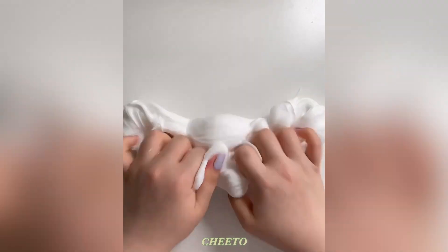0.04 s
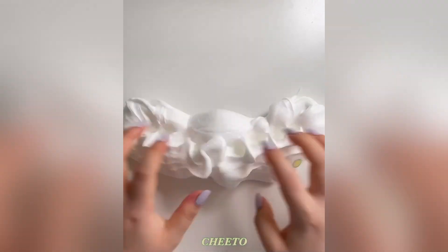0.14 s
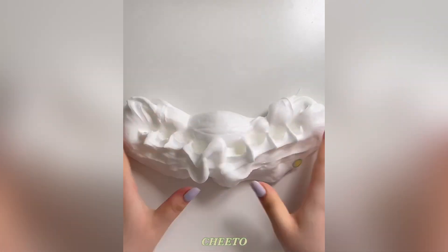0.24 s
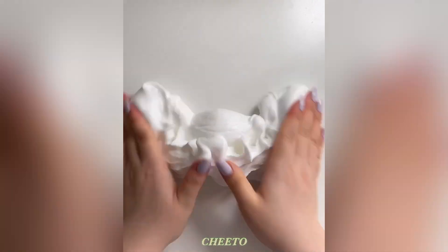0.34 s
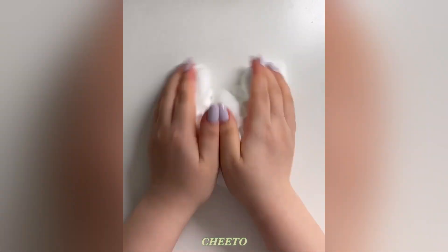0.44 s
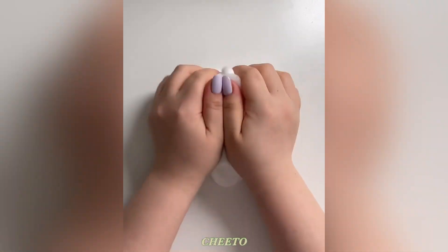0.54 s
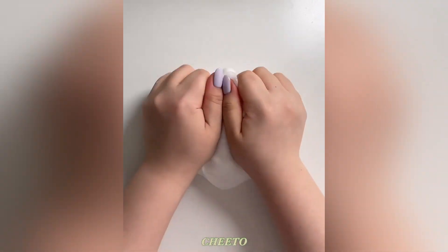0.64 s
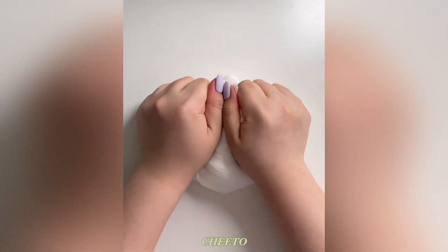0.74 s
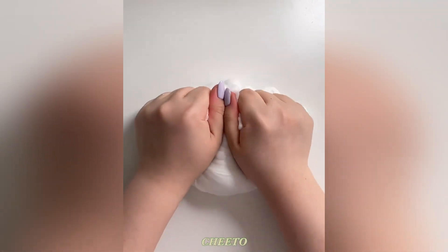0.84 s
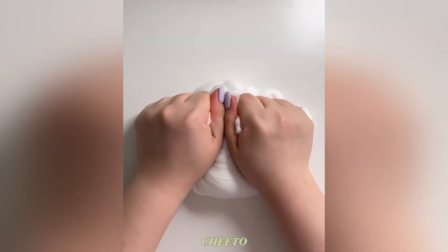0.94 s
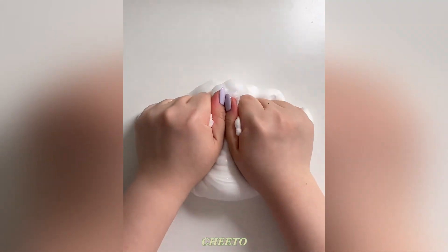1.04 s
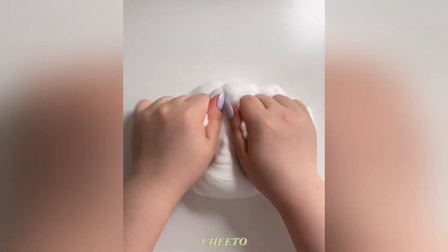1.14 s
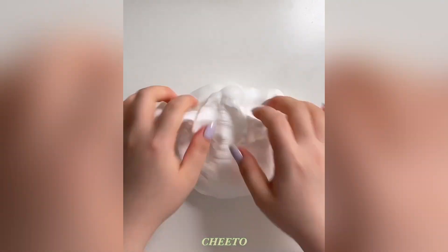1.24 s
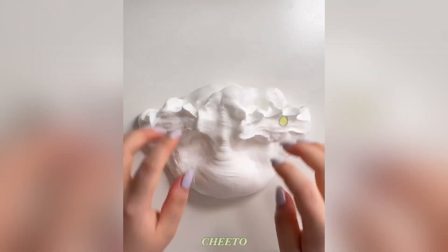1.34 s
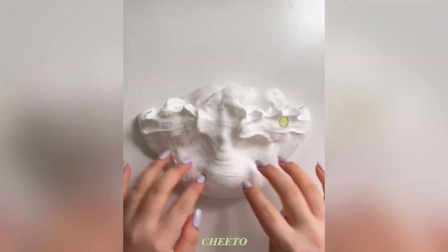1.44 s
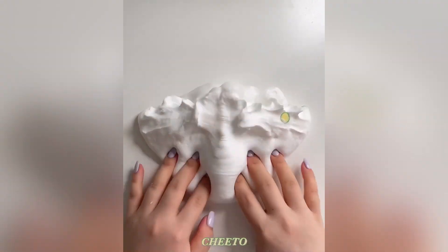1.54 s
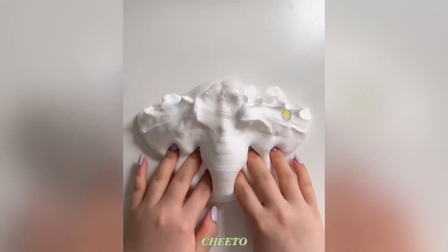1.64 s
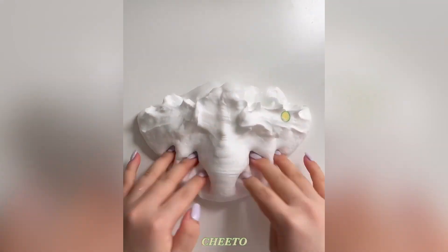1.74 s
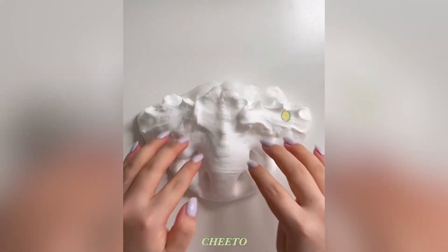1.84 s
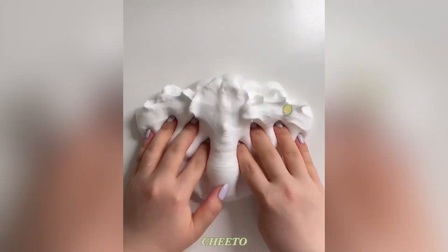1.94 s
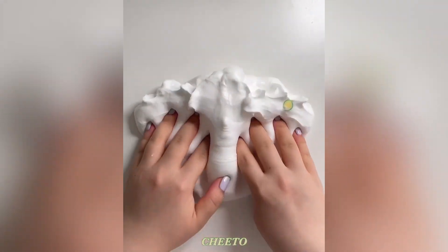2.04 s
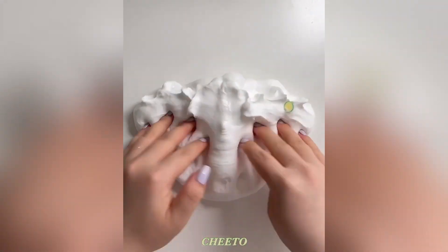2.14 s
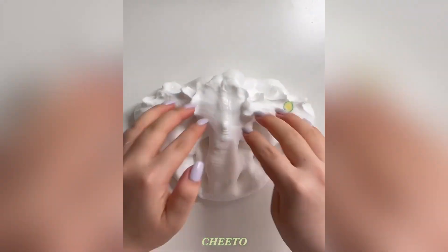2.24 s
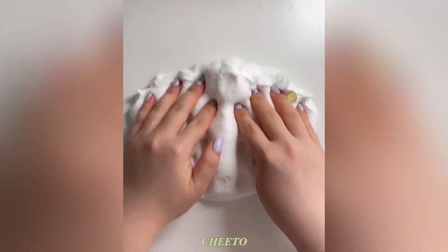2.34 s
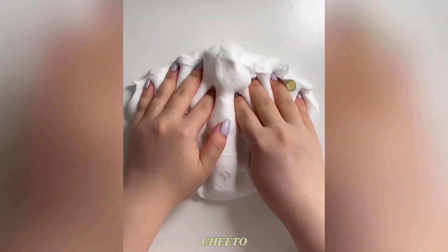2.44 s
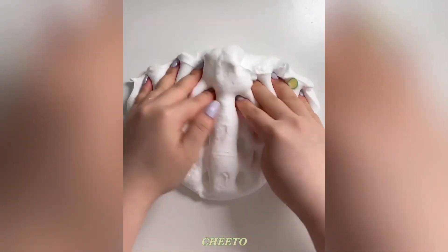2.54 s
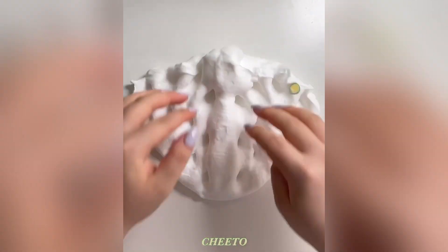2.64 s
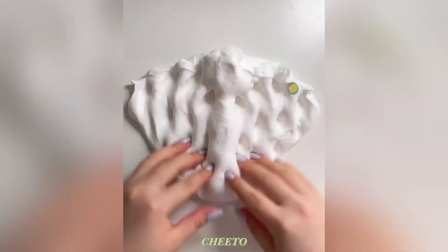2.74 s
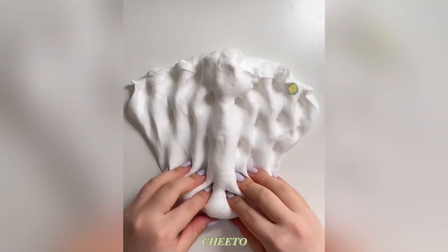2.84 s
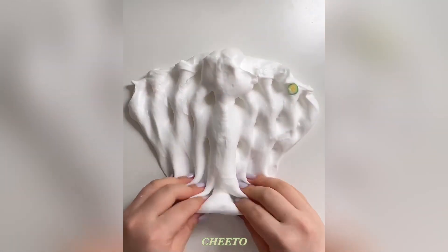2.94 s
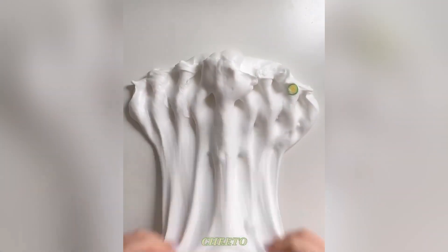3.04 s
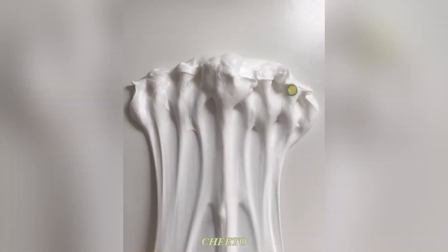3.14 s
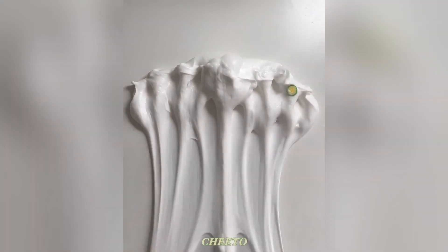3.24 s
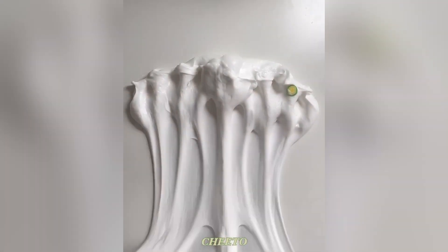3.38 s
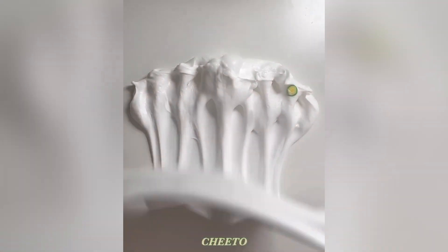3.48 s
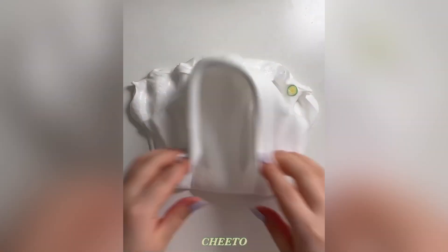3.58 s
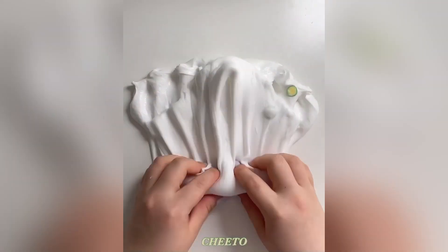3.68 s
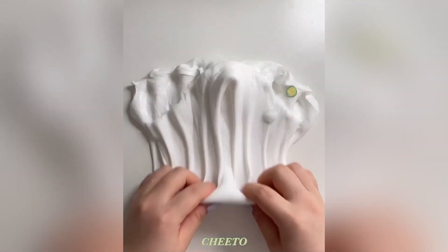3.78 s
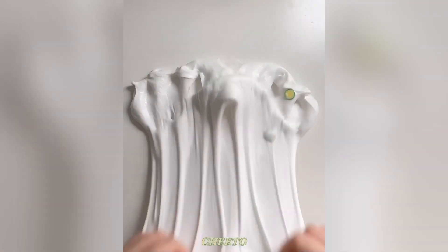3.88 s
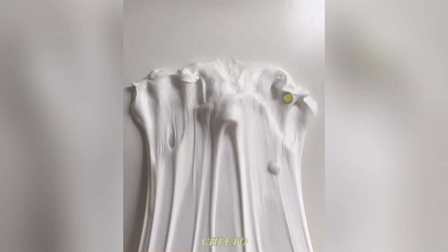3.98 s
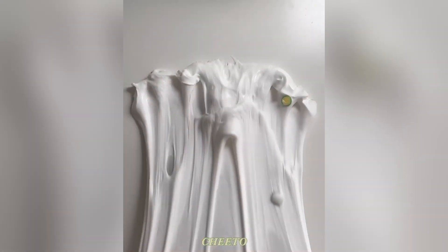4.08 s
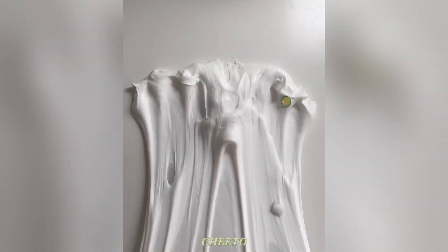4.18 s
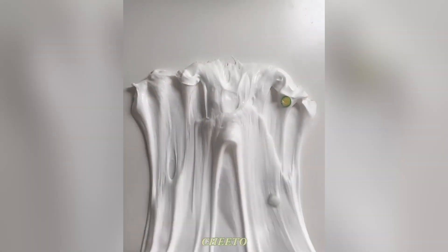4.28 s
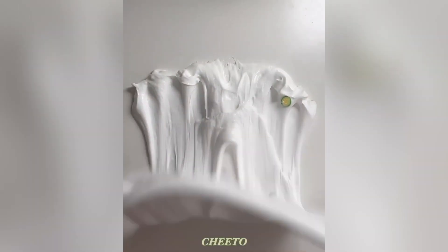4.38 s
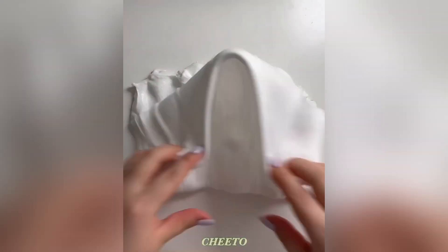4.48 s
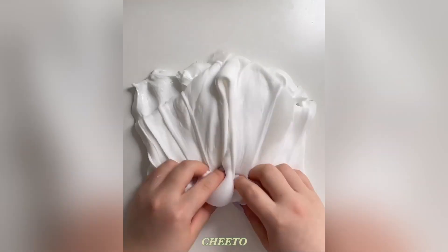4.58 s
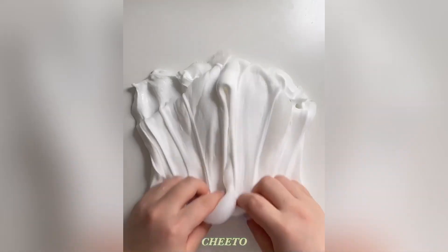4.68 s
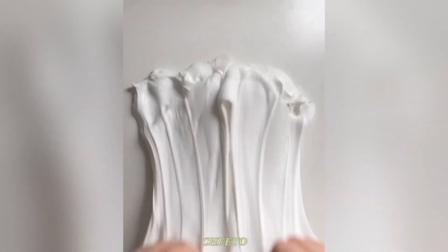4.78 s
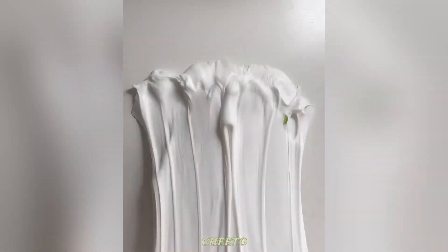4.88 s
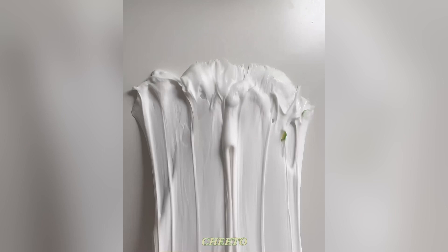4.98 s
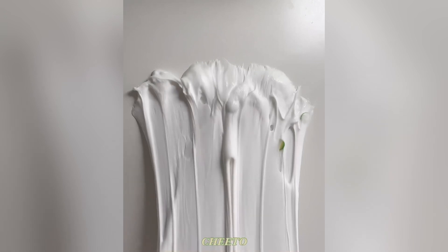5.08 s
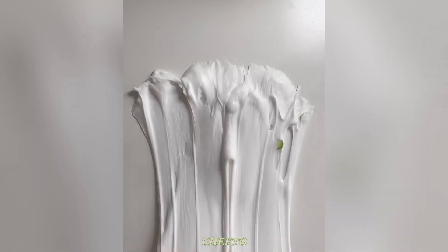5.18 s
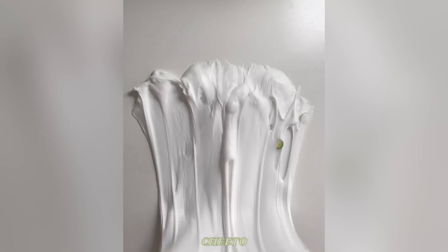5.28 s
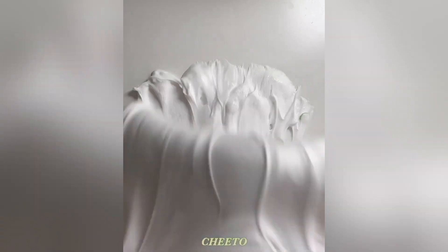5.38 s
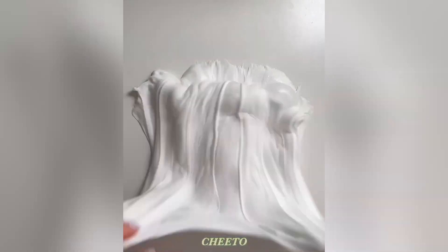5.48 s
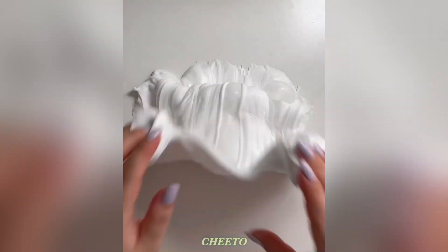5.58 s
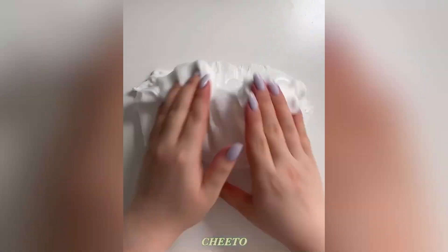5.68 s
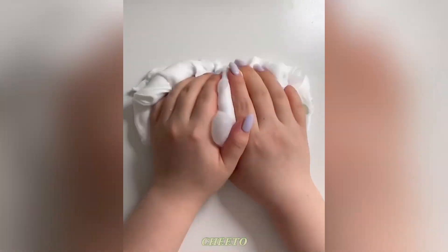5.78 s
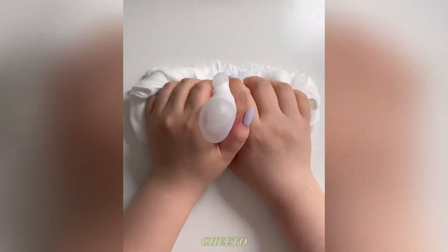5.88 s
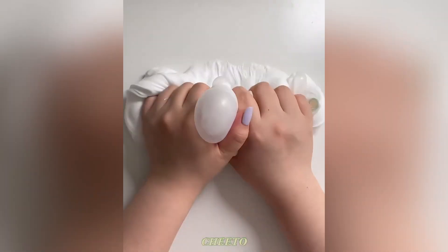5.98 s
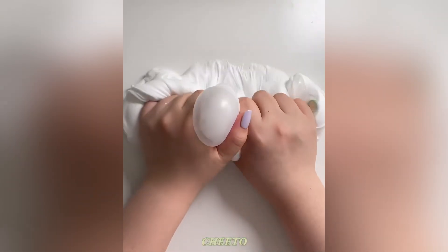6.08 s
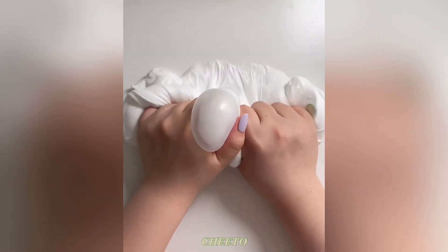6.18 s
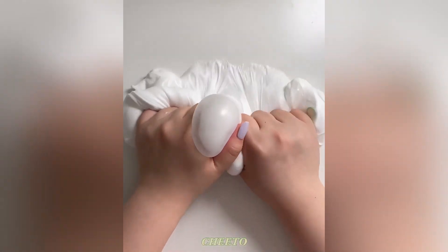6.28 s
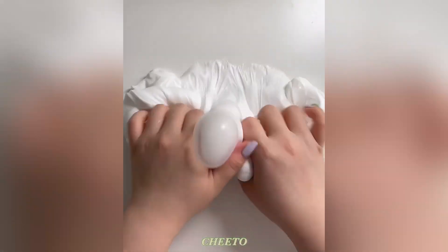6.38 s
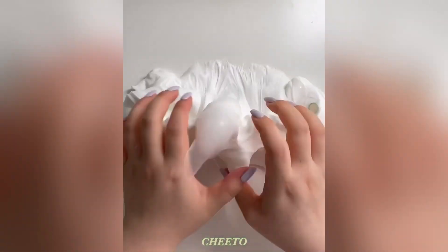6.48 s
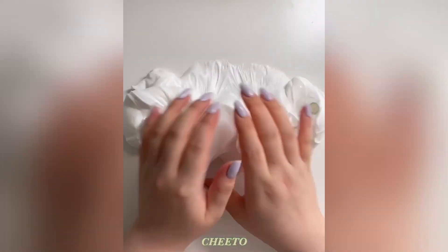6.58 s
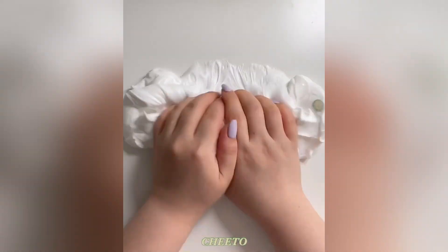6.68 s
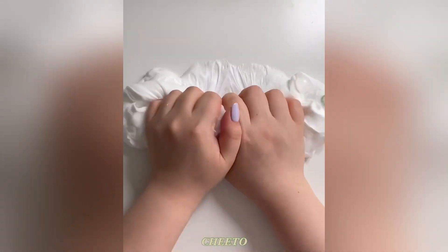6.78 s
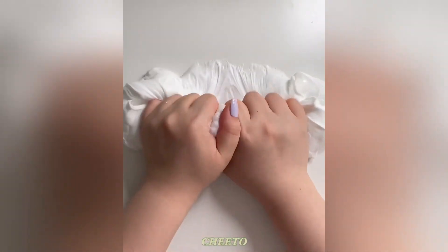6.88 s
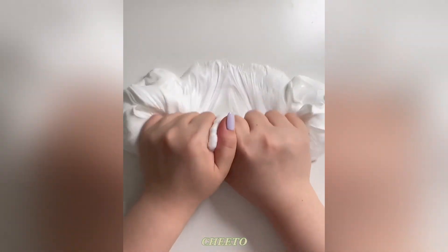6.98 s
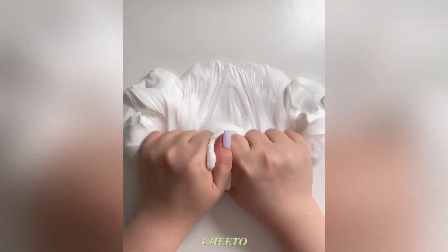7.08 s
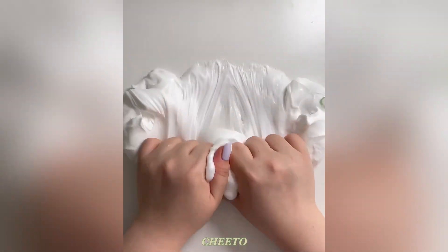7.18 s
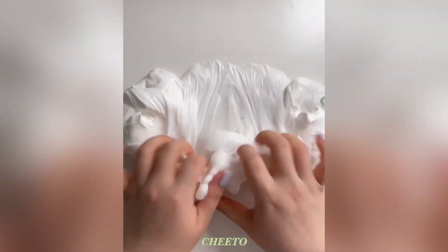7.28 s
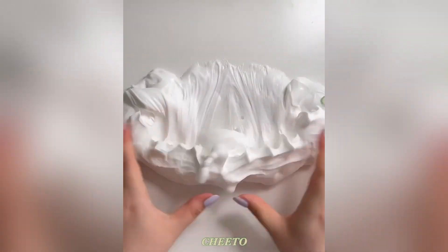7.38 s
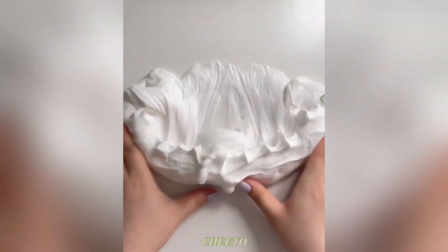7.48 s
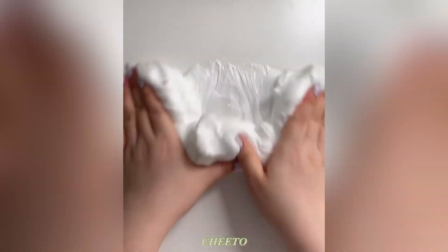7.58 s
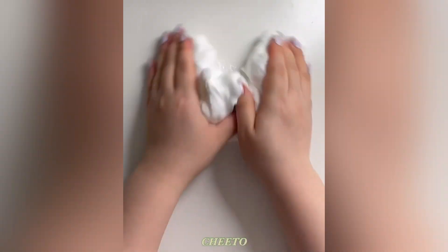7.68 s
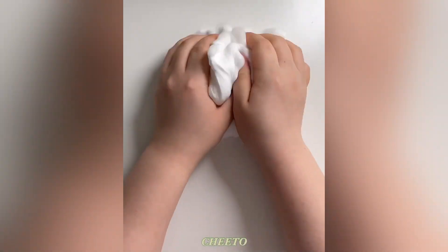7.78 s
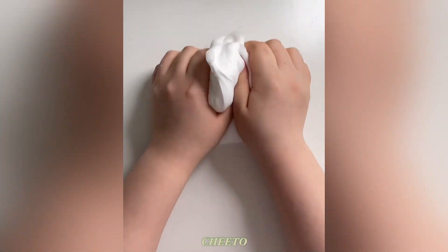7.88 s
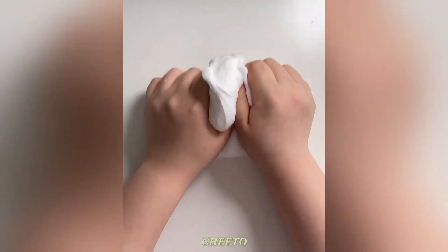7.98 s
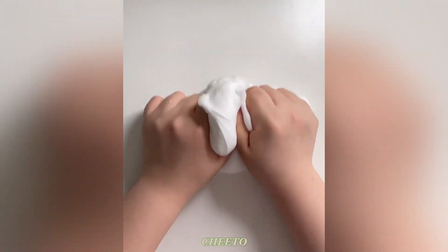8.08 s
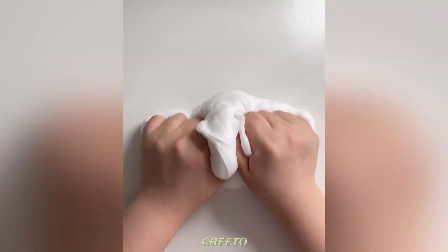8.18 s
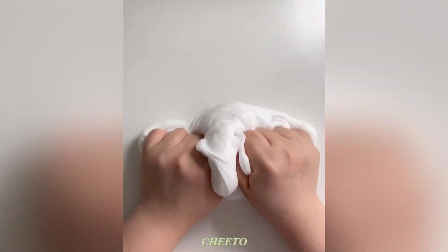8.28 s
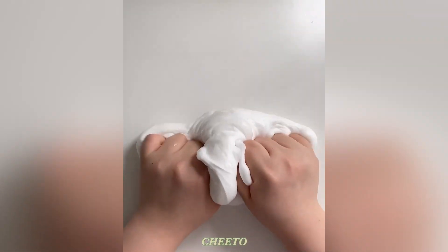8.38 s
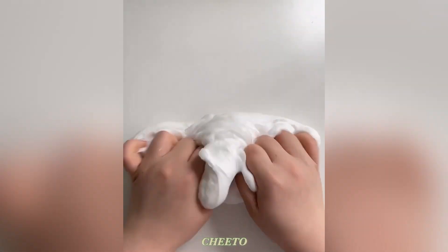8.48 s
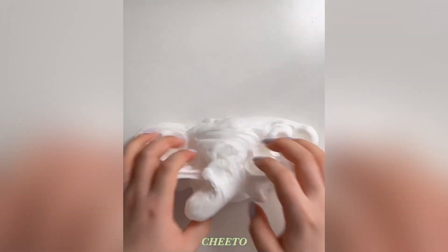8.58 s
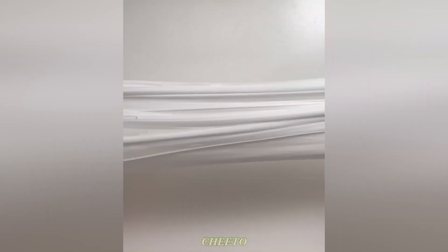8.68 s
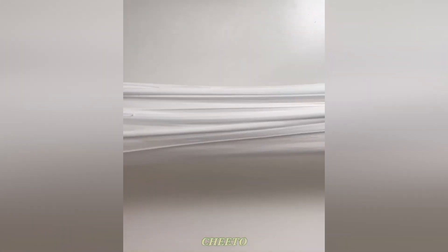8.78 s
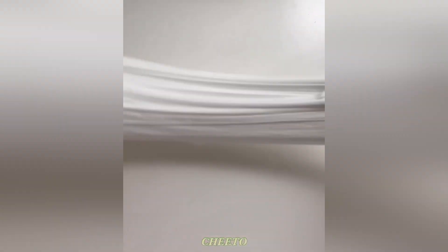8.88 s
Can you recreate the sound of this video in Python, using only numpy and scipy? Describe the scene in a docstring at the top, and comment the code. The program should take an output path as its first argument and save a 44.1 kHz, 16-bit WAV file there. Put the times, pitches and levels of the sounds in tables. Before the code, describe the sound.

Close, dry sound of thick slime handled on a table in a small room, over a faint wavering low hum. A soft crackle starts it, then from 0.4 to 0.9 s a cluster of bright pops and a low bump. Finger presses give short bursts with table knocks near 1.1, 1.7, 2.1 and 2.5 s, with thin wet fizz between. A quieter stretch at about 3 s leads to a very loud double snap at 3.5; another strong snap comes at 4.45, then soft pulling and hollow pops at 5.4. From 5.7 to 6.15 s a dense barrage of loud, clipped hollow pops, a low thump and tiny gliding squeaks of escaping air. After a short fizzy lull, another crackling run lasts from 6.6 to 7.2. Sparser pops follow, a hard snap at 8.0, soft blops at 8.4, a tiny airy chirp at 8.54, then a faint stretching hiss.

```python
"""On a table in a small room, thick slime is squeezed, folded and stretched by hand close to a microphone.
Air pockets burst as snaps, ringing cavities and table knocks; a few whistle in gliding tones as they empty.
Soft low bumps land, and coloured noise and tiny damped bubbles fizz while the slime moves.
Decaying noise tails make the room, wavering low noise makes the hum, and the loudest bursts clip."""
import sys
import numpy as np
from scipy import signal
from scipy.fft import rfft, irfft, next_fast_len
from scipy.io import wavfile
from scipy.ndimage import uniform_filter1d, map_coordinates

SR = 44100
rng = np.random.default_rng(int(sys.argv[2]) if len(sys.argv) > 2 else 0)


def waveform_to_disk(signal):
    """Save audio, clipped to [-1, 1], as 16-bit WAV at the path in sys.argv[1]."""
    frames = np.transpose(np.atleast_2d(signal))
    scaled = np.clip(frames, -1, 1) * 32767
    samples = np.round(scaled).astype(np.int16)
    wavfile.write(sys.argv[1], SR, samples)


N = 393806  # samples
SPAN_DB = 20  # the level change over which swell and fade times are given


def pops(rows):
    """The film tears and snaps, the opened cavity rings, loose slime sputters, the recoil knocks the table."""
    start_s, level_db, cavity_hz, snap_db, knock_db = np.transpose(rows)[..., None]
    lead_s = .003  # room for the onset to swell before the peak
    t = np.arange(SR // 40) / SR - lead_s
    noise = rng.standard_normal((len(rows), 2, len(t)))

    def swell(rise_s, fall_s):
        """Exponential rise to the peak at t = 0 and exponential fall after it."""
        return np.exp(np.minimum(t / rise_s, -t / fall_s))

    def band(x, lo_hz, hi_hz):
        """Band-pass filter that narrows noise to one region."""
        return signal.sosfilt(signal.butter(2, (lo_hz, hi_hz), "band", fs=SR, output="sos"), x)

    # higher cavities die sooner
    cavity = np.cos(2 * np.pi * cavity_hz * t) * swell(0.00056, 1.3 / cavity_hz)
    sputter = 1.263 * band(noise[:, 0], 740, 3280) * swell(0.00038, 0.0029)
    snap = band(noise[:, 1], 3800, 8840) * swell(0.00048, 0.002)
    air = amp(level_db) * (cavity + sputter) + amp(level_db + snap_db + 2.5) * snap
    # one short push, 1.5 ms after the peak
    recoil = amp(level_db + knock_db + 11.5) * np.exp(-((t - .0015) / 0.00036) ** 2)
    onset_s = start_s[:, 0] - lead_s
    return placed(onset_s, air) + table(placed(onset_s, recoil))


def small_pops(count):
    """Rows for pops() at chance moments: small pockets burst as strongly as the slime is worked."""
    when, pitch, size, snap, knock = rng.random((count, 5)).T
    start_s = .01 + when * (N / SR - .02)
    fizz_db = effort()[0][(start_s * SR).astype(int)]
    over_fizz_db, spread_db = 7.5, 10.5  # middle and full range of the level over the fizz
    grows, full_db = 0.71, -35.5  # below full_db of fizz, pops sink by this many further dB per dB
    sink_db = grows * np.minimum(fizz_db - full_db, 0)
    level_db = fizz_db + sink_db + over_fizz_db + spread_db * (size - .5)
    cavity_hz = 650 * 8 ** pitch
    snap_db = -5.5 + 16 * (snap - .5)
    knock_db = -9 + 24 * (knock - .5)
    return np.transpose([start_s, level_db, cavity_hz, snap_db, knock_db])


def whistles():
    """Air leaves a closing hole: a wavering, fluttering tone with weak overtones glides as the pocket empties."""
    # air whistling out: start_s [s], length_s [s], start_hz and end_hz [Hz, before waver],
    # level_db [dB, before flutter]
    leaks = [(5.657, .035, 1650, 1350, -27), (5.677, .014, 2400, 2900, -27), (5.786, .008, 5400, 4900, -19),
             (5.781, .006, 2400, 2000, -11), (5.785, .028, 1650, 1300, -6), (5.837, .005, 3900, 4300, -9),
             (5.841, .012, 5300, 5000, -6), (6.04, .045, 7100, 6900, -25), (6.708, .017, 9300, 5600, -7),
             (6.716, .009, 3900, 2400, -12), (8.542, .006, 1000, 600, -17)]
    out = np.zeros(N)
    for start_s, length_s, start_hz, end_hz, level_db in leaks:
        u = np.arange(round(length_s * SR)) / (length_s * SR)  # progress, 0 to 1
        waver = uniform_filter1d(rng.standard_normal((3, len(u))), size=40)
        pitch_hz = (start_hz + (end_hz - start_hz) * u) * (1 + .25 * waver[0])
        phase = 2 * np.pi * np.cumsum(pitch_hz) / SR
        # an inharmonic upper flutter of the rim, pi times the pitch
        lips = amp(-20.5 + 14.3 * waver[2]) * np.sin(np.pi * phase)
        # wet spray
        spit = amp(-18) * np.diff(uniform_filter1d(rng.standard_normal(len(u) + 1), size=8)) * 4
        tone = np.sin(phase) + amp(-24) * np.sin(2 * phase) + lips + spit
        level = amp(level_db + 22 * waver[1]) * np.sin(np.pi * u) ** .4
        out[round(start_s * SR):][:len(u)] += level * tone
    return out


def bumps():
    """A palm or a fold of slime lands softly: a short damped tone that sinks in pitch."""
    # low bumps and blops on the table: start_s [s], strength_db [dB, before the envelope],
    # pitch_hz [Hz, reached after sinking]
    landings = [(0.422, -9, 130), (3.846, -24, 62), (3.905, -25.5, 65), (4.667, -22, 68), (4.703, -15, 98),
                (5.413, -14.5, 85), (5.849, -2.5, 177.6), (6.03, -9, 143), (6.051, -10, 79.6),
                (6.702, -15.5, 90), (7.385, -20.5, 200), (7.785, -16.5, 155), (7.853, -11, 262),
                (8.408, -12, 760), (8.42, -18, 470), (8.546, -21, 260)]
    start_s, strength_db, pitch_hz = np.transpose(landings)[..., None]
    t = np.arange(SR // 5) / SR
    sag, sag_s = .4, 0.0048  # starts this share above its pitch and sinks with this time constant
    phase = 2 * np.pi * pitch_hz * (t + sag * sag_s * (1 - np.exp(-t / sag_s)))
    envelope = np.exp(-t / .012) * (1 - np.exp(-t / 0.0015))
    return placed(start_s[:, 0], amp(strength_db) * np.sin(phase) * envelope)


def motion():
    """Skin and film hiss as they slide, bubbles crackle more under hard squeezing, fingers shake the table."""
    # hiss colour: pitch_hz [Hz], density_db [dB per Hz, relative]
    hiss_colour = [(400, -36.5), (1100, 2), (2500, 0.5), (4000, -4.5), (8500, -10), (10500, -15.5)]
    fizz_db, knead_db = effort()
    squeeze = np.clip((fizz_db + 47.0) / 20, .05, 1)
    hiss = amp(2.7 * wobble(60)) * coloured(rng.standard_normal(N), hiss_colour)
    fizz = hiss + 1.13 * squeeze * unit(bubbles(count=2500))
    # separate soft presses, about 260 a second, over a faint rub
    touch = 0.059 + (rng.random(N) < 260 / SR) * 1.4
    taps = rng.standard_normal(N) * touch
    knead = table(uniform_filter1d(taps, size=24))
    return amp(fizz_db) * fizz + amp(knead_db) * unit(knead)


def bubbles(count):
    """Small bubbles, each a few damped cycles at its own pitch and size."""
    when, pitch, size = rng.random((count, 3)).T[..., None]
    pitch_hz = 800 * 9 ** pitch
    cycles = pitch_hz * np.arange(SR // 100) / SR
    shape = np.sin(2 * np.pi * cycles) * np.exp(-cycles / 1.7) * (1 - np.exp(-cycles / 0.71))
    size_db = np.minimum(-5 * np.log(1 - size), 22)  # many small, few large
    return placed(when[:, 0] * N / SR, amp(size_db) * shape)


def effort():
    """Level in dB of the fizz and of the kneading, from the summed power of presses and pulls."""
    # fingers press into the slime: start_s [s, the peak], fizz_db [dB], knead_db [dB, on the table]
    presses = [(0.0, -33, -30), (.435, -27.5, -25.5), (.53, -51.5, -27), (.6, -42, -27), (.815, -47, -42),
               (1.085, -28.5, -17.5), (1.415, -45.5, -30), (1.668, -34, -15.5), (1.89, -66.5, -43),
               (2.075, -27.5, -11.5), (2.28, -52, -42), (2.46, -46, -38.5), (2.5, -27, -15),
               (2.695, -33.5, -26), (3.5, -38, -35.5), (3.535, -25.5, -16.5), (3.71, -39, -33.5),
               (4.438, -25.5, -27.5), (4.72, -51, -47), (5.405, -32.5, -30.5), (5.665, -33, -29),
               (5.85, -21, -23), (5.95, -38.5, -19), (6.04, -25.5, -24), (6.265, -35, -25),
               (6.34, -37.5, -31), (6.585, -34, -24), (6.655, -27, -31), (6.7, -22, -40.5),
               (6.91, -28, -33), (7.39, -62, -46), (7.498, -33, -27), (7.86, -36.5, -25), (8.0, -38, -19),
               (8.41, -43, -20), (8.55, -62, -36)]
    # slow pulls, folds and slides: peak_s [s], swell_s [s] and fade_s [s] over SPAN_DB, fizz_db [dB]
    slow_pulls = [(.235, .035, 0.34, -42.5), (.33, 0.11, 0.63, -36), (.6, 0.25, 0.43, -46),
                  (1.15, 0.13, 0.055, -34), (1.35, 0.6, 0.29, -51.5), (1.88, 0.15, 0.072, -51.5),
                  (2.299, 0.36, 0.16, -47.5), (2.91, 0.11, 0.23, -36), (3.401, 0.21, 0.4, -54),
                  (3.72, 0.42, .28, -40), (4.26, 0.16, 0.16, -47), (4.62, 0.083, 0.25, -38.5),
                  (4.8, 0.37, 0.16, -46.5), (5.22, 0.24, 0.15, -46.5), (5.6, 0.037, .2, -49),
                  (5.76, .2, 0.86, -37.5), (6.31, 0.066, 0.11, -33), (6.831, 0.18, 0.27, -34),
                  (7.211, 0.18, 0.075, -32), (7.55, 0.2, 0.78, -35.5), (8.1, 0.81, 0.2, -42),
                  (8.4, 0.054, 0.23, -31.5), (8.48, 0.13, 0.06, -33.5), (8.839, 0.12, 0.46, -41)]
    press_s, press_fizz_db, press_knead_db = np.transpose(presses)
    peak_s, swell_s, fade_s, pull_db = np.transpose(slow_pulls)
    still_db = -76  # slime left at rest
    # power 1 = straight slopes in dB, more = rounder top and steeper ends
    pulls = peaks(peak_s, pull_db, swell_s, fade_s, 1.42) + amp(still_db) ** 2
    fizz_rise_db_s, fizz_fall_db_s = 698, 175.5
    knead_rise_db_s, knead_fall_db_s = 1500.5, 217.5
    fizz = pulls + peaks(press_s, press_fizz_db, SPAN_DB / fizz_rise_db_s, SPAN_DB / fizz_fall_db_s, 0.99)
    press_knead = peaks(press_s, press_knead_db, SPAN_DB / knead_rise_db_s, SPAN_DB / knead_fall_db_s, 1)
    knead = pulls * amp(-8) ** 2 + press_knead  # pulls knead 8 dB below their fizz
    return 10 * np.log10(fizz), 10 * np.log10(knead)


def peaks(peak_s, level_db, swell_s, fade_s, power):
    """Summed power of swells that rise and fall SPAN_DB in the given times."""
    t = np.arange(0, N, 64)[:, None] / SR - peak_s  # one value every 64 samples
    shape_db = level_db - SPAN_DB * np.maximum(-t / swell_s, t / fade_s) ** power
    return np.repeat(np.sum(amp(shape_db) ** 2, axis=1), 64)[:N]


def table(push):
    """The pushed table top rings in its resonant modes, added with alternating sign."""
    # modes of the table top: centre_hz [Hz], width_hz [Hz], level_db [dB]
    modes = [(124, 32, -5.5), (259.2, 29.2, 0), (454.4, 45, -6.5), (603, 24, -8), (746, 110, -8.5),
             (1073, 140, -10.5)]

    def response(f):
        """Sum of damped resonances; a wider mode dies sooner."""
        return sum((-1) ** k * amp(level_db) * 1j * f * width / (centre * centre - f * f + 1j * f * width)
                   for k, (centre, width, level_db) in enumerate(modes))

    return filtered(push, response)


def room(x):
    """Each frequency dies at its own speed; two noise tails alternate as the hands move, here at random."""
    # decay of the room: pitch_hz [Hz], t60_s [s to fall 60 dB]
    decay = [(100, 0.34), (500, 0.41), (2000, 0.16), (9000, 0.12)]
    turn = np.pi / 4 * (1 + np.tanh(0.75 * wobble(8)))
    wet = np.zeros(N)
    for share in (np.cos(turn), np.sin(turn)):
        hz, t, bins = signal.stft(rng.standard_normal(SR // 2), SR, nperseg=256)
        fading = bins * amp(-60 * t / along(decay, hz)[:, None])
        tail = signal.istft(fading, SR, nperseg=256)[1]
        late = np.pad(x * share, (130, 0))  # the answer waits about 3 ms
        wet += signal.fftconvolve(late, tail / np.linalg.norm(tail))[:N]
    return wet


def hum():
    """The low, slightly wavering background of the room, made of coloured noise."""
    # hum colour: pitch_hz [Hz], density_db [dB per Hz, relative]
    hum_colour = [(20, -43), (32, -37.5), (54, -5), (75, -11), (120, -7), (300, -22.5), (600, -19.5),
                  (900, -27), (2400, -65), (10000, -66)]
    waver_db = 1.5 * wobble(3)
    return amp(-46.5 + waver_db) * coloured(rng.standard_normal(N), hum_colour)


def amp(db):
    """Decibels to linear amplitude."""
    return 10 ** (np.asarray(db) / 20)


def unit(x):
    """x scaled to rms 1."""
    return x / np.sqrt(np.mean(x ** 2) + 1e-20)


def along(points, hz):
    """Values at hz between (Hz, value) points on a log frequency axis."""
    f, v = np.transpose(points)
    return np.interp(np.log(hz + 1), np.log(f + 1), v)


def wobble(rate):
    """A smooth random curve, rate knots a second."""
    return map_coordinates(rng.standard_normal(int(N * rate / SR) + 4), [np.arange(N) * rate / SR])


def filtered(x, response):
    """x with its spectrum multiplied by a complex response of frequency."""
    m = next_fast_len(N + SR // 2)  # padding lets the ringing die out
    return irfft(rfft(x, m) * response(np.fft.rfftfreq(m, 1 / SR)), m)[:N]


def coloured(x, spectrum):
    """x shaped by the given spectrum, rms 1."""
    return unit(filtered(x, lambda hz: amp(along(spectrum, hz))))


def placed(start_s, sounds):
    """Mix in which each row of sounds starts at its time."""
    at = np.round(start_s * SR).astype(int)[:, None] + np.arange(sounds.shape[1])
    return np.bincount(at.ravel(), sounds.ravel(), N + SR)[:N]


def scene():
    """Bursts, whistles and bumps with their room answer, over the slime's motion and the hum."""
    # the larger bursting pockets: start_s [s, the peak], level_db [dB], cavity_hz [Hz],
    # snap_db and knock_db [dB relative to level_db, before the trims in pops()]
    large_pockets = [(0.025, -23.5, 2610, -8, -4), (0.043, -23.5, 2320, -6, -19),
                     (0.423, -12, 1200, -9.5, -3), (0.431, -13.5, 1250, -16.5, -3),
                     (0.503, -16.5, 2240.0, -9.5, -4), (0.533, -4.5, 4130, 1, -25),
                     (0.545, -6, 2430.0, -9.5, -6.5), (0.58, -3.5, 4240, -2.5, -28.5),
                     (0.608, -4, 5440, -11, -8), (0.618, -13, 1930, -4, -8.5),
                     (0.642, -11.5, 3270, 2.5, -9), (0.691, -18.5, 1900, 5, -33),
                     (0.75, -25, 2000, 7.5, -16), (0.806, -8.5, 1930, -2, -12.5),
                     (0.833, -9, 4050, -4.5, -36), (0.874, -16.5, 1780, -11.5, -15),
                     (1.067, -20, 990.0, -13, 1), (1.086, -14, 2520.0, -13, 1),
                     (1.098, -17.5, 690.0, -15, 10), (1.405, -22, 2500.0, -7.5, 0.5),
                     (1.472, -18, 1670, -34, -30.5), (1.654, -6.5, 2650.0, -6, -3.5),
                     (1.67, -7.5, 2440, -4, -4), (1.676, -6.5, 2570, -23, 4), (1.687, -13.5, 610, -6, 0),
                     (1.694, -12, 930.0, -12.5, -23), (1.901, -31.5, 2180, -31, -6),
                     (2.061, -4, 930.0, -5.5, -2), (2.08, -5.5, 1770.0, -13, 6),
                     (2.088, -9.5, 5340.0, 2.5, 11.5), (2.095, -26, 580, -3, 18),
                     (2.105, -3.5, 5020.0, -4, 4), (2.228, -34, 1920.0, -2.5, -14),
                     (2.279, -28.5, 1550, -8, 6.5), (2.483, -12.5, 1820, 0.5, 5),
                     (2.509, -5, 1790, 0.5, -24), (2.532, -2, 980, -10.5, -2),
                     (2.679, -21.5, 2460, 2.5, -15), (2.685, -21.5, 930, -15, 9.5),
                     (2.804, -25, 1580, -10, -21), (2.886, -30, 5700, 8, -20), (2.933, -20, 2400, -1, -20),
                     (3.515, -11.5, 1560, -10.5, -10), (3.529, 6, 2500, -28, -9),
                     (3.547, 6, 2340, -13.5, -4.5), (3.556, -4.5, 650, -31.5, -11),
                     (3.571, -2, 2200, -28.5, -20), (3.702, -13, 2640, -23, -11),
                     (3.708, -15, 2600, -25, -27), (3.844, -23.5, 1160.0, -13, -22),
                     (4.446, -10.5, 865, -13, -27), (4.456, 2.5, 2330, -11.5, -19),
                     (4.461, -6.5, 1380.0, -23, -4), (4.498, -8.5, 1830, -36, -14),
                     (4.595, -23.5, 1260, -7.5, -8), (4.645, -21, 1150, -25, -18),
                     (5.04, -35, 664, -20, -6), (5.395, 1, 1220, -45, -28.5), (5.406, -4, 800, -26, -43),
                     (5.413, -4.5, 940, -20, -3), (5.599, -28.5, 2100, -6.5, -9.5),
                     (5.72, -2.5, 2180, -22, -4.5), (5.754, -26, 4450, -13.5, -16),
                     (5.787, -10, 1570, -16.5, -22.5), (5.816, -9, 1030, -30, -2.5),
                     (5.855, 6, 1053, -25, -19), (5.86, 5, 1190, -38, -2.5), (5.869, -1, 1200, -33, -11.5),
                     (5.892, -11, 1220, -11, -7), (5.905, -7, 1280, -21, -21),
                     (5.925, 3.5, 1360.0, -13, -13.5), (5.94, -4.5, 2610.0, -19, -16),
                     (5.955, -22.5, 800.0, -8, -4), (5.959, 2, 1135, -30, -13),
                     (5.969, -8, 1110, -12.5, -13), (6.0, -22, 1115, 5, -8), (6.028, 7, 2190, -41, -10),
                     (6.037, 0.5, 1010, -1.5, -15), (6.043, 1, 2640, -20, -6.5),
                     (6.067, -12, 2620, -16, -11), (6.089, 0.5, 5060, -29, -24),
                     (6.106, -14, 4030, 3.5, -14), (6.129, -11.5, 1740.0, -4, -7),
                     (6.156, -12.5, 4000, -7.5, -5.5), (6.333, -7, 3660.0, -8, -48),
                     (6.607, -18.5, 1710, 3, 0), (6.662, -16.5, 2380, -5.5, -23),
                     (6.679, -6.5, 1330, -40, -1.5), (6.689, 3, 1320, -30, -6), (6.696, 0.5, 4200, -6, -11),
                     (6.714, -11.5, 1870.0, 5, -5), (6.719, -12.5, 3380, -5, -21),
                     (6.738, -16.5, 5940, 12, 0), (6.765, -16.5, 1930, 12.5, 1),
                     (6.775, -9, 3810.0, 0, -11), (6.808, -3, 1990, -0.5, -11.5),
                     (6.83, -11, 1890, -7, -14), (6.856, -6, 1830, -36, -5), (6.873, -5, 1870.0, -30, -36),
                     (6.898, -4.5, 980, -17, -9), (6.911, -3.5, 2370, -36, -8.5),
                     (7.027, -3.5, 2260, -13.5, -11), (7.071, -11, 2440, -13, -8),
                     (7.149, -5.5, 4130, -22, -43), (7.206, -16.5, 2560.0, -8, -10),
                     (7.377, -39, 624, 0, 15), (7.509, -9, 1210.0, -31, -13), (7.602, -14, 1930, -29, -4.5),
                     (7.638, -14.5, 4800, -11, -3), (7.707, -12.5, 3700.0, -4, -2.5),
                     (7.746, -21, 2420, -1, -20), (7.784, -13.5, 1040, -11, -1),
                     (7.825, -19.5, 2290, -7, -4), (7.855, -19.5, 620, 11, 8), (7.973, -17, 2170.0, -9, 5),
                     (7.994, 6, 2600, -10, -8), (8.001, -7.5, 2750, -13, -5), (8.02, -11, 990, -1.5, -10),
                     (8.034, -8.5, 1160.0, -18, -25.5), (8.081, -26.5, 670.0, 8, -7),
                     (8.106, -22.5, 960, -18, 8), (8.196, -18, 2620, -21, -23),
                     (8.402, -13, 670.0, -7.5, -27), (8.41, -10.5, 820, -23, -12),
                     (8.415, -14.5, 900.0, -29, -2), (8.543, -32.5, 830, -31, 16.5),
                     (8.809, -30, 4090.0, -2, -17), (8.905, -29, 765, -24, -26)]
    hits = pops(large_pockets) + pops(small_pops(count=140)) + whistles() + bumps()
    # a small source makes no deep bass
    dry_hits = signal.sosfilt(signal.butter(2, 55, "high", fs=SR, output="sos"), hits)
    return (dry_hits + amp(-12.0) * room(dry_hits) + motion() + hum())[None]


def record(dry):
    """The microphone dips near 3 kHz, the converter clips, nothing is kept above the band limit."""
    top_hz = 10150  # centre of a 500 Hz wide slope
    mic = filtered(dry[0], lambda hz: amp(-6 * np.exp(-((hz - 3150) / 250) ** 2)))
    clipped = np.clip(mic, -1, 1)
    return filtered(clipped, lambda hz: np.clip((top_hz - hz) / 500 + .5, 0, 1) ** 2)[None]


dry = scene()
out = record(dry)
waveform_to_disk(out)
```